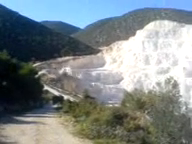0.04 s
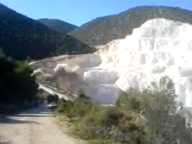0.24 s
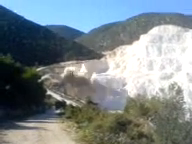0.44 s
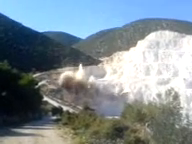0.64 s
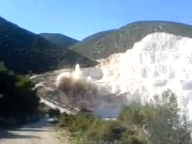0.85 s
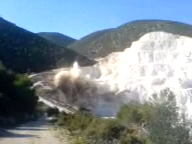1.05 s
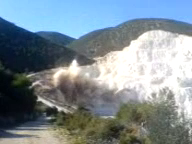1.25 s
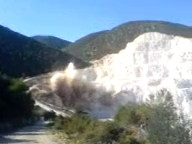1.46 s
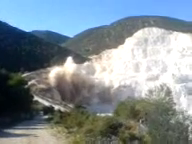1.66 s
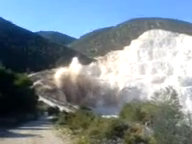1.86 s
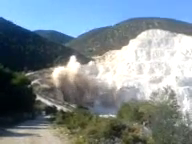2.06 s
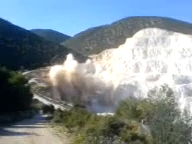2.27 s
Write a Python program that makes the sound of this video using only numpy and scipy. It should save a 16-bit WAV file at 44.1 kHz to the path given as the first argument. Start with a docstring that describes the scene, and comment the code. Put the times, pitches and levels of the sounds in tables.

```python
"""A quarry shot goes off in open air: a cracking pressure front, a howl of venting gas, the roar of bursting rock.
Cracks and vent are shaped noise, the thump and pitched thuds damped sines, rock and stone showers of random blows.
Heavy blocks tumble after it, and as the roar dies, loose stone keeps rattling down the face.
A deep rumble, a hollow drone and faint outdoor air, all noise-like, lie underneath at the one microphone.
A small narrow-band recorder is driven far into clipping for the first second and more."""
import sys
import numpy as np
from scipy import signal
from scipy.fft import rfft, irfft, next_fast_len
from scipy.io import wavfile
from scipy.ndimage import map_coordinates

SR = 44100
rng = np.random.default_rng(int(sys.argv[2]) if len(sys.argv) > 2 else 0)


def inscribe(sig):
    """Save sig as 16-bit PCM at rate SR to the path in sys.argv[1].

    A 1-D sig is mono; a 2-D sig holds one channel per row.
    Samples are clipped to [-1, 1] before scaling.
    """
    pcm = np.round(np.clip(np.atleast_2d(sig).T, -1, 1) * 32767)
    wavfile.write(sys.argv[1], SR, pcm.astype(np.int16))


N = 101430


def amp(db):
    """Decibels to gain."""
    return 10 ** (np.asarray(db) / 20)


def unit(x):
    """Scale to rms 1."""
    return x / np.sqrt(np.mean(x ** 2) + 1e-20)


def clock():
    """The time of each sample in seconds."""
    return np.arange(N) / SR


def noise():
    """White noise for the whole scene."""
    return rng.standard_normal(N)


def level(rows):
    """Gain per sample from rows of seconds and dB, silent before the first."""
    s, db = np.transpose(rows)
    return amp(np.interp(clock(), s, db)) * (clock() >= s[0])


def decay(age, t60_s):
    """Exponential fade that loses 60 dB in t60_s seconds."""
    return np.exp(-np.log(1000) * age / t60_s)


def filtered(x, gain):
    """Minimum-phase, hence causal, filter with the given gain as a function of frequency."""
    size = 2 * next_fast_len(N)
    hz = np.fft.rfftfreq(size, 1 / SR)
    cepstrum = irfft(np.log(np.maximum(gain(hz), 1e-6)))
    # Folding the cepstrum onto positive time gives the minimum phase
    cepstrum[1:size // 2] *= 2
    cepstrum[size // 2 + 1:] = 0
    response = np.exp(rfft(cepstrum))
    return irfft(rfft(x, size) * response)[:N]


def coloured(x, points):
    """x filtered to a colour drawn through (Hz, dB) points on a log frequency axis, at rms 1."""
    f, db = np.transpose(points)
    return unit(filtered(x, lambda hz: amp(np.interp(np.log(hz + 1), np.log(f), db))))


def resonant(x, centre_hz, width_hz):
    """x through one resonance, at half amplitude width_hz / 2 either side of its centre, at rms 1."""
    return unit(filtered(x, lambda hz: 1 / (1 + (2 * (hz - centre_hz) / width_hz) ** 2)))


def impacts(per_s, scatter_db):
    """A shower of blows at random times with random signs and sizes."""
    hit = rng.random(N) < per_s / SR
    sign = rng.choice([-1, 1], N)
    size_db = scatter_db * np.clip(noise(), -2, 2)
    return hit * sign * amp(size_db)


def wobble(per_s):
    """A smooth random curve with the given number of knots a second."""
    return map_coordinates(rng.standard_normal(400), [clock() * per_s], mode="wrap")


# Sharp reports as the front arrives at the microphone. Each row: start in seconds, peak level in dB.
CRACKS = [(0.2174, -16.5), (0.2266, -2.5), (0.2304, -3)]
# Colour of a report. Each row: frequency in Hz, gain in dB.
CRACK_COLOUR = [(60, -8.5), (250, -4.5), (700, -1), (1700, -16.5), (2600, -7), (3500, -7.5), (4300, -41.5)]
CRACK_T60_S = 0.045
THUMP_S, THUMP_HZ, THUMP_DB = 0.2205, 234, 2  # level before the rise and decay
THUMP_RISE_S, THUMP_T60_S = 0.0062, 0.088


def front():
    """The pressure front: a few cracks of decaying noise and a low, quickly damped sine thump."""
    age = np.maximum(clock() - THUMP_S, 0)
    envelope = (1 - np.exp(-age / THUMP_RISE_S)) * decay(age, THUMP_T60_S)
    out = -amp(THUMP_DB) * envelope * np.sin(2 * np.pi * THUMP_HZ * age)
    for s, db in CRACKS:
        age = clock() - s
        burst = noise() * (age > 0) * decay(abs(age), CRACK_T60_S)
        crack = coloured(burst, CRACK_COLOUR)
        out = out + amp(db) * crack / abs(crack).max()
    return out


VENT_S, VENT_RISE_S, VENT_HOLD_S = 0.238, 0.006, 0.39  # hold counts from the start
VENT_DB, VENT_FALL_DB_PER_S = -7, 28.5
VENT_HZ, VENT_LATE_HZ, VENT_WIDTH_HZ, VENT_SAG_S = 774, 681, 263, 0.329


def venting():
    """Gas howls out of the holes; its resonance sags as the pressure falls, by fading between two bands."""
    age = clock() - VENT_S
    sag = np.clip(age / VENT_SAG_S, 0, 1) ** 2
    early = resonant(noise(), VENT_HZ, VENT_WIDTH_HZ)
    late = resonant(noise(), VENT_LATE_HZ, VENT_WIDTH_HZ)
    rise = np.clip(age / VENT_RISE_S, 0, 1)
    fall_db = VENT_FALL_DB_PER_S * np.maximum(age - VENT_HOLD_S, 0)
    howl = np.sqrt(1 - sag) * early + np.sqrt(sag) * late
    return rise * amp(VENT_DB - fall_db) * howl


# Surges of the bursting rock. Each row: time in seconds, level in dB.
ROAR = [(.222, -22.5), (.25, -8.5), (.32, -8), (.41, -5.5), (.5, 1), (.61, -7.5), (.655, -4), (.68, -6.5),
        (.703, -1), (.73, -5.5), (.78, -2), (.85, -1), (.89, -9.5), (.925, 1.5), (.98, -8.5), (1.005, -3),
        (1.07, -9), (1.1, -1.5), (1.125, -12), (1.19, -9), (1.22, -6.5), (1.32, -7.5), (1.4, -13),
        (1.47, -16.5), (1.53, -33), (1.65, -22.5), (1.76, -32)]
# Colour of the roar. Each row: frequency in Hz, gain in dB.
ROAR_COLOUR = [(60, -29), (350, -8), (600, -5.5), (900, 1.5), (1200, 0.5), (1400, 2), (1750, 3.5),
               (2100, -4), (2650, -11.5), (3300, -9.5), (3800, -15.5), (4300, -29.5)]


def bursting_rock():
    """Thousands of fractures a second merge into a surging roar."""
    return level(ROAR) * coloured(impacts(per_s=4000, scatter_db=1.5), ROAR_COLOUR)


# Swell and fading of the tumbling blocks. Each row: time in seconds, level in dB.
BLOCKS = [(.222, -14), (.3, -13), (.4, -18), (.51, -12), (.58, -17), (.77, -10.5), (.87, -4), (1.02, -0.5),
          (1.08, -8), (1.14, -6), (1.2, -8.5), (1.26, -7), (1.35, -7), (1.45, -12), (1.53, -20),
          (1.57, -15), (1.6, -20.5), (1.65, -16), (1.71, -19), (1.76, -26), (1.88, -24.5), (2.1, -35.5),
          (2.3, -32)]
# Dull colour of their knocks. Each row: frequency in Hz, gain in dB.
BLOCK_COLOUR = [(20, -35), (60, -19.5), (140, -13), (200, -4), (275, 2.5), (350, 0), (480, 1), (720, -0.5),
                (1000, -11.5), (2000, -21), (4000, -63.5)]


def blocks():
    """Tumbling blocks knock dully against each other."""
    return level(BLOCKS) * coloured(impacts(per_s=1100, scatter_db=1), BLOCK_COLOUR)


# Low thuds and higher, pitched knocks of landing blocks within the rumble, all with one rise and decay. # Each
# row: start in seconds, pitch in Hz, level in dB before rise and decay.
PITCHED_THUDS = [(.43, 85, -21.5), (0.521, 89, -25), (.82, 112, -10), (0.851, 336, -3.5), (.87, 74, -14),
                 (0.93, 81.5, -6), (0.998, 90, -9), (1.002, 235, -3), (1.062, 188, -2.5), (1.118, 364, 0.5),
                 (1.258, 500, -0.5), (1.299, 352, -1), (1.4, 308, -7.5)]
THUD_RISE_S, THUD_T60_S = 0.008, 0.14


def pitched_thuds():
    """Low thuds and higher, pitched knocks of landing blocks within the rumble, each a soft-edged, damped sine."""
    out = np.zeros(N)
    phases = rng.uniform(0, 2 * np.pi, len(PITCHED_THUDS))
    for (s, hz, db), phase in zip(PITCHED_THUDS, phases):
        age = np.maximum(clock() - s, 0)
        envelope = (1 - np.exp(-age / THUD_RISE_S)) * decay(age, THUD_T60_S)
        out += amp(db) * envelope * np.sin(2 * np.pi * hz * age + phase)
    return out


# Loose stone on the face. Each row: time in seconds, level in dB.
SLIDE = [(1.2, -14), (1.5, -19.5), (1.65, -22), (1.8, -24.5), (2, -24.5), (2.3, -22.5)]
# Colour of the rattling stone. Each row: frequency in Hz, gain in dB.
SLIDE_COLOUR = [(30, -34.5), (130, -23), (280, -6), (480, -7.5), (700, -3), (950, -3), (1230, 3),
                (1430, -1.5), (1750, 2.5), (2050, -5.5), (2400, -9), (2850, -22.5), (3350, -16.5),
                (3700, -30), (4300, -48)]
# Hiss of fine grit, before its flutter. Each row: time in seconds, level in dB.
GRIT = [(1.5, -56), (1.63, -35.5), (1.72, -47), (1.96, -44), (1.995, -33), (2.04, -40), (2.14, -36),
        (2.3, -37)]
GRIT_HZ, GRIT_WIDTH_HZ, GRIT_FLUTTER_DB = 3345, 270, 1


def slide():
    """Loose stone rattles down the face as a shower of blows, with a thin, fluttering noise hiss of grit."""
    stones = level(SLIDE) * coloured(impacts(per_s=3500, scatter_db=3), SLIDE_COLOUR)
    flutter = amp(GRIT_FLUTTER_DB * wobble(per_s=12))
    grit = level(GRIT) * flutter * resonant(noise(), GRIT_HZ, GRIT_WIDTH_HZ)
    return stones + grit


# Deep colour of the ground rumble. Each row: frequency in Hz, gain in dB.
GROUND_COLOUR = [(15, -21), (40, -8.5), (85, 4.5), (140, 5), (260, -17), (600, -34.5)]
GROUND_PEAK_S, GROUND_DB, GROUND_TAIL_DB = 0.99, -20.5, -48
GROUND_RISE_DB_PER_S, GROUND_FALL_DB_PER_S = 26, 39.5


def ground():
    """A deep rumble, a shower of dull blows, swells to one peak, then fades to a low murmur."""
    age = clock() - GROUND_PEAK_S
    swell_db = GROUND_DB + np.minimum(GROUND_RISE_DB_PER_S * age, -GROUND_FALL_DB_PER_S * age)
    envelope = np.hypot(amp(swell_db), amp(GROUND_TAIL_DB)) * (clock() > THUMP_S)
    return envelope * coloured(impacts(per_s=550, scatter_db=1.5), GROUND_COLOUR)


DRONE_HZ, DRONE_WIDTH_HZ = 284, 76
DRONE_PEAK_S, DRONE_DB, DRONE_SLOPE_DB_PER_S = 1.623, -22, 41.5


def drone():
    """A hollow low resonance in noise rises out of the rumble as the roar dies, then sinks again."""
    db = DRONE_DB - DRONE_SLOPE_DB_PER_S * abs(clock() - DRONE_PEAK_S)
    return amp(db) * (clock() > THUMP_S) * resonant(noise(), DRONE_HZ, DRONE_WIDTH_HZ)


# Colour of the outdoor air. Each row: frequency in Hz, gain in dB.
AIR_COLOUR = [(30, -29), (140, -18), (330, 0.5), (700, -7.5), (1300, -9), (2400, -10.5), (3300, -10),
              (3700, -25.5), (4300, -29)]
# Colour of the tick near the microphone. Each row: frequency in Hz, gain in dB.
TICK_COLOUR = [(80, -18), (300, 0), (1000, 0), (1500, -12), (2300, -16), (4000, -35)]
AIR_DB, TICK_S, TICK_DB = -57, 0.0748, -37.5  # air level is rms, tick level is peak


def quiet():
    """Faint outdoor air as steady noise, and one small tick, a filtered click, near the microphone."""
    air = coloured(noise(), AIR_COLOUR)
    click = 1.0 * (np.arange(N) == round(TICK_S * SR))
    tick = coloured(click, TICK_COLOUR)
    return amp(AIR_DB) * air + amp(TICK_DB) * tick / abs(tick).max()


def scene():
    """Everything reaches one microphone."""
    blast = front() + venting() + bursting_rock()
    rubble = blocks() + pitched_thuds() + slide()
    background = ground() + drone() + quiet()
    return (blast + rubble + background)[None]


BAND_HZ, BAND_STEEP = 4100, 26  # upper band edge and filter order
CLIP_LEVEL, CLIP_HARDNESS = 0.69, 29.4  # ceiling, and sharpness of the bend into it
TOP_HZ = 15900


def record(dry):
    """The recorder passes a narrow band, then clips; the clipping makes the treble above that band."""
    narrow = filtered(dry[0], lambda hz: 1 / np.sqrt(1 + (hz / BAND_HZ) ** (2 * BAND_STEEP)))
    overload = abs(narrow / CLIP_LEVEL) ** CLIP_HARDNESS
    clipped = narrow / (0.5 + overload) ** (1 / CLIP_HARDNESS)
    low_pass = signal.firwin(301, TOP_HZ, window="blackman", fs=SR)
    return signal.fftconvolve(clipped, low_pass, mode="same")[None]


dry = scene()
out = record(dry)
inscribe(out)
```